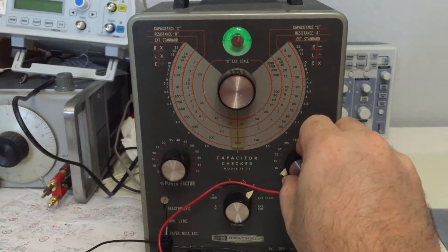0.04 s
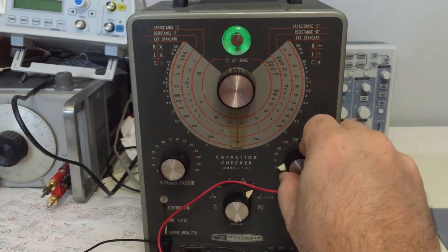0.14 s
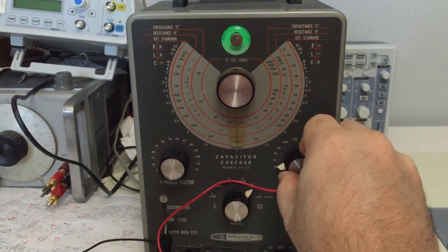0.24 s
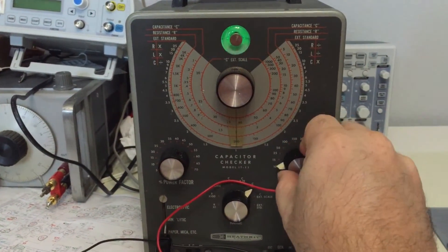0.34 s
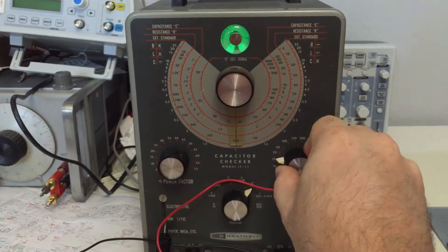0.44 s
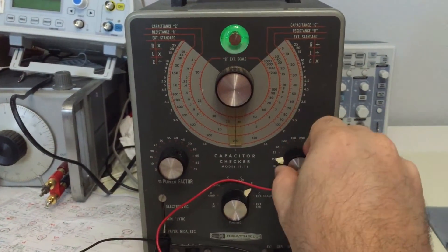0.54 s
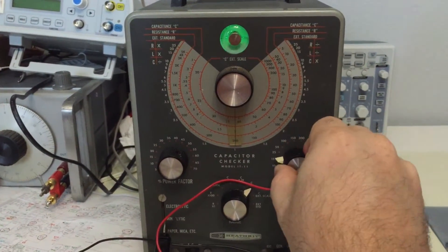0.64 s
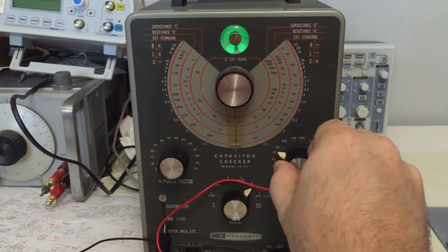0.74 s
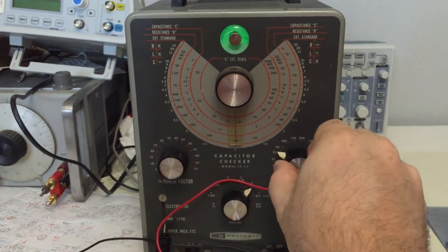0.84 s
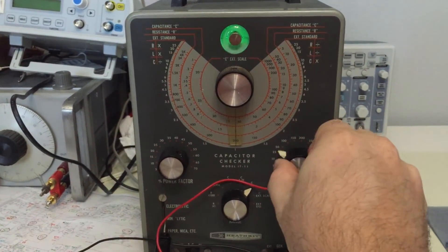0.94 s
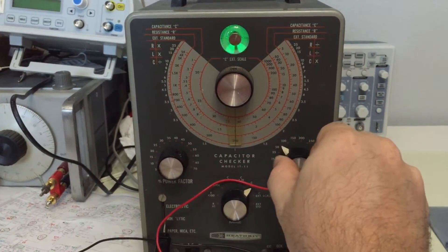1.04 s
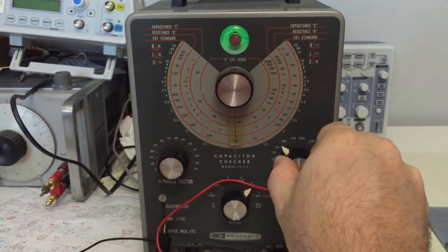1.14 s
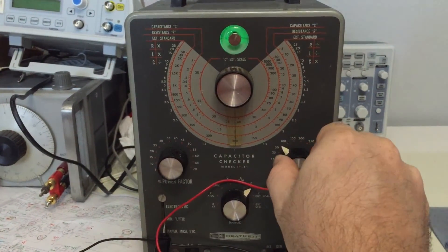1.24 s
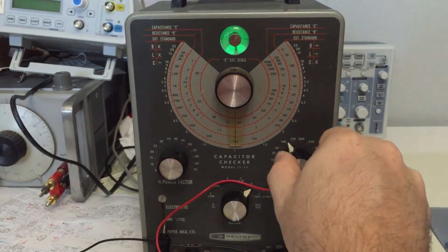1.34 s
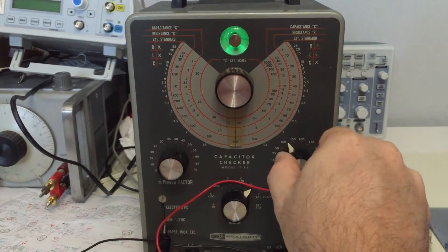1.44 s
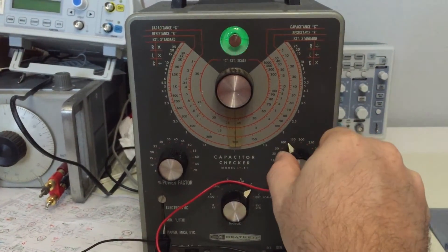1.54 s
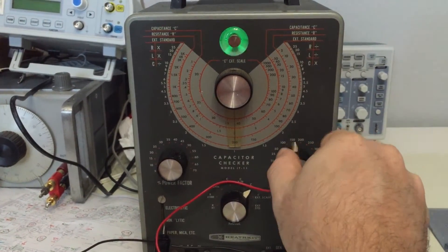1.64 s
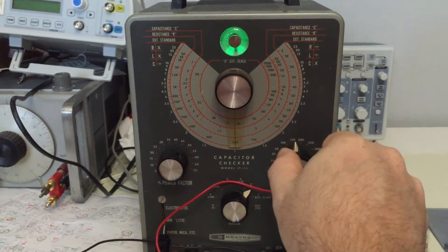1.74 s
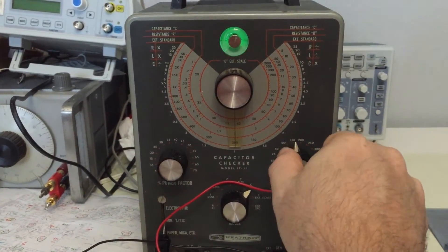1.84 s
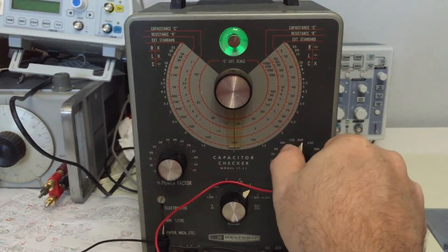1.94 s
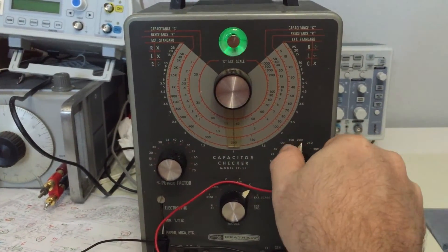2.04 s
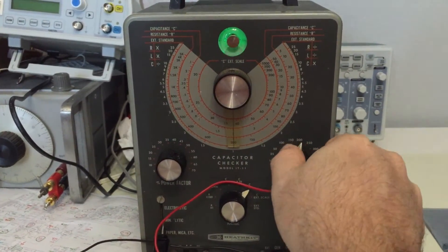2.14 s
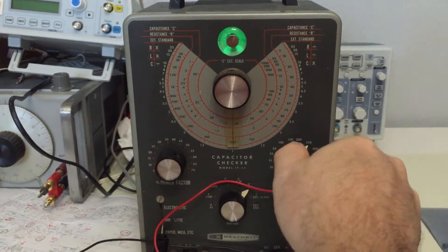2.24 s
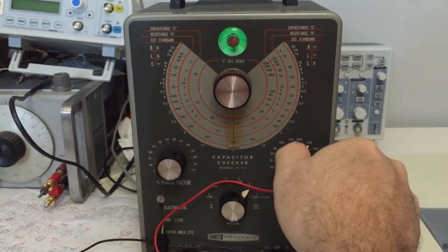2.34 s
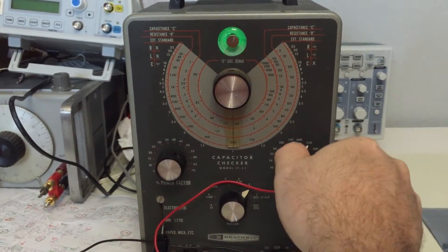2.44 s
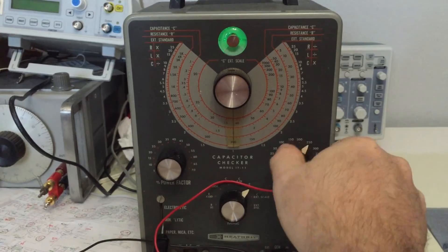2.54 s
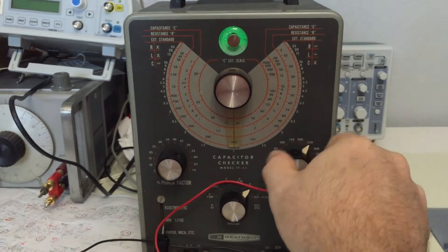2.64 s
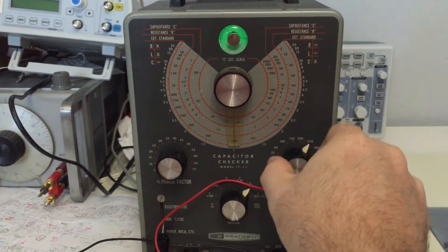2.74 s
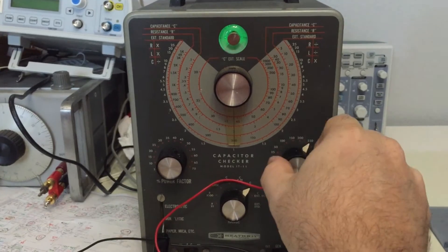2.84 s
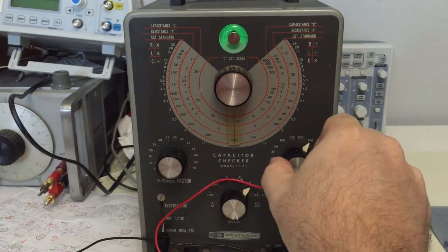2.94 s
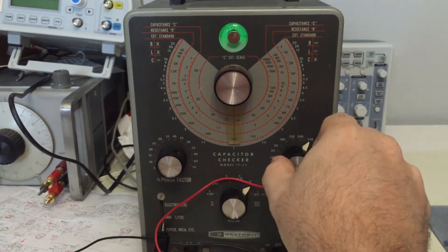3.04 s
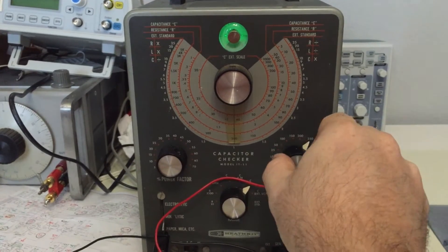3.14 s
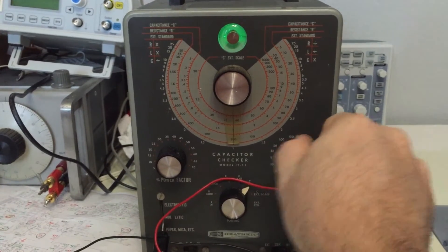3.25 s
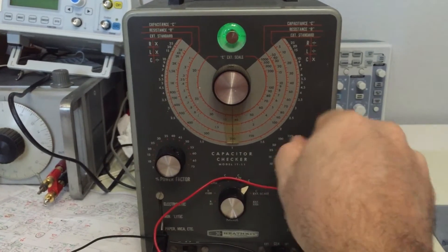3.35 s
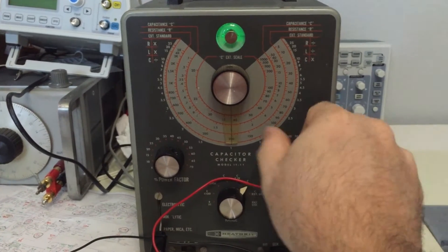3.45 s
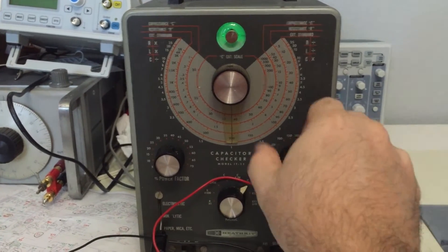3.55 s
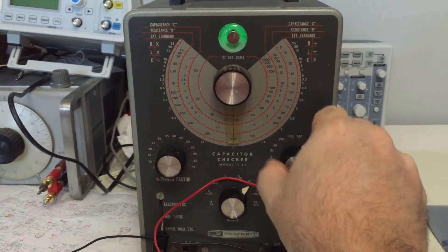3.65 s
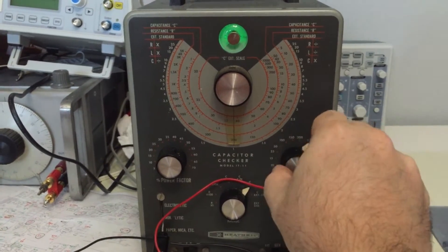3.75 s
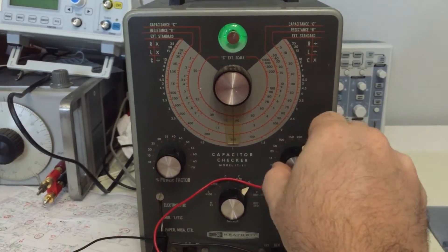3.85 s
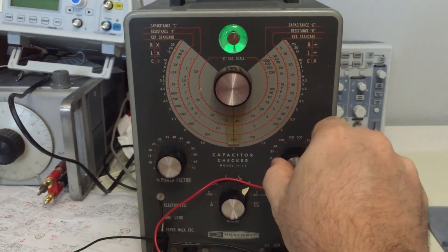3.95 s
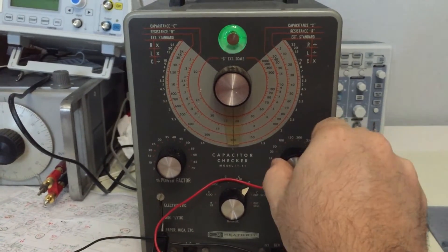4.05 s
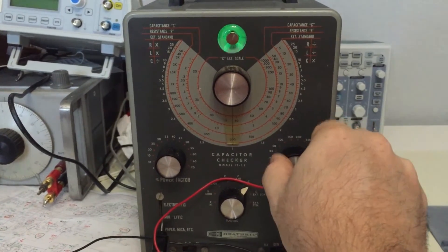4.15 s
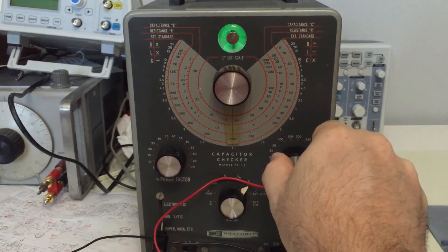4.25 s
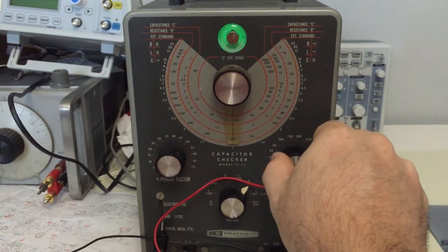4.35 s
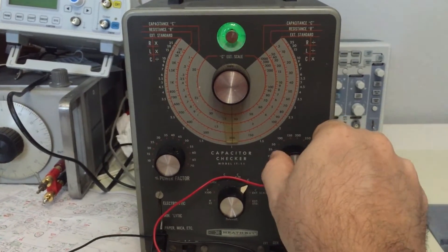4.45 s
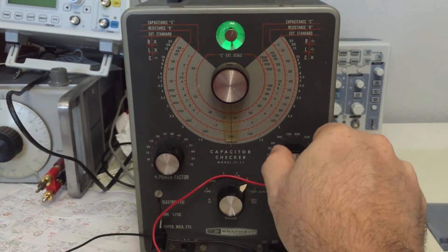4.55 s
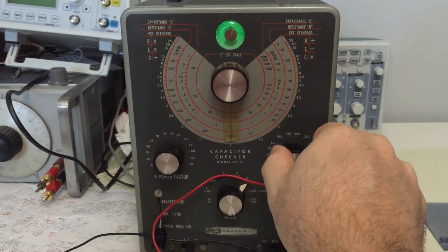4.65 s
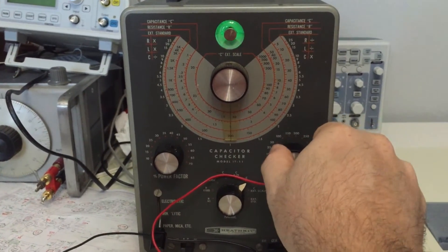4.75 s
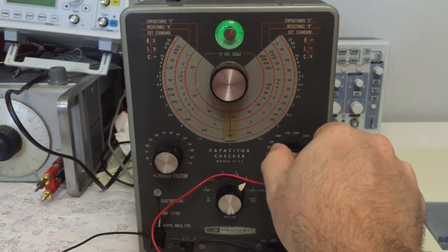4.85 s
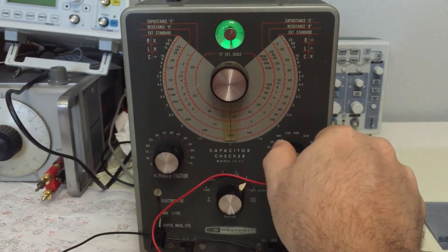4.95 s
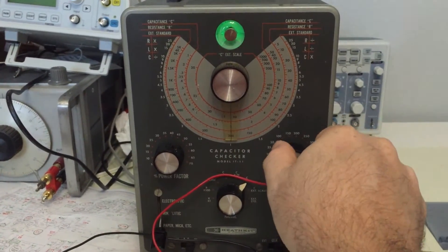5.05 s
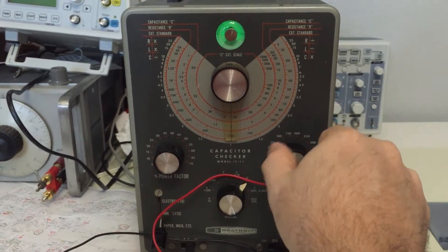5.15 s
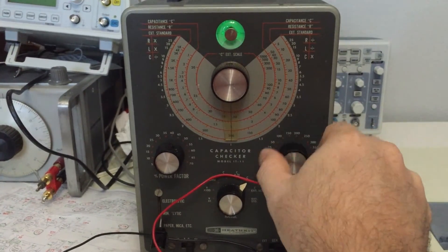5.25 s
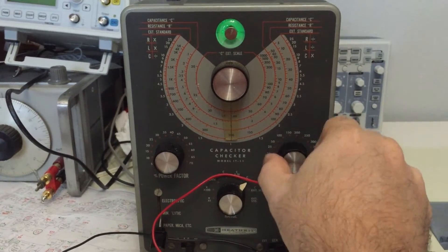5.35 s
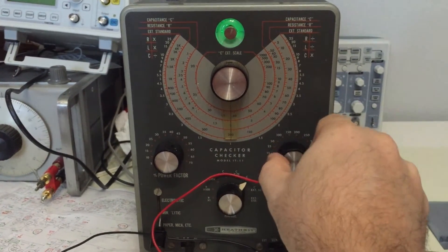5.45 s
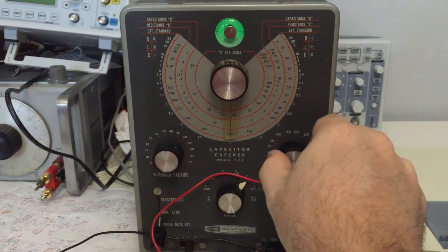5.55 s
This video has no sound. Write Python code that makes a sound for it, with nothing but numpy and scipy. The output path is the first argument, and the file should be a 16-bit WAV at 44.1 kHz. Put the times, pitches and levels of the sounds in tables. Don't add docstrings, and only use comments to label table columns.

```python
import sys
import numpy as np
from scipy import signal
from scipy.io import wavfile
from scipy.ndimage import uniform_filter1d

SR = 44100
rng = np.random.default_rng(int(sys.argv[2]) if len(sys.argv) > 2 else 0)


def generate_wav(sig):
    pcm = np.round(np.clip(np.atleast_2d(sig).T, -1, 1) * 32767).astype(np.int16)
    wavfile.write(sys.argv[1], SR, pcm)


def elevation(decibels):
    levels = np.asarray(decibels, float)
    return 10 ** (levels / 20)


N = 247004


def peaked(x):
    return x / np.abs(x).max()


def read(points, hz):
    f, value = np.transpose(points)
    return np.interp(np.log(hz + 1), np.log(f + 1), value)


def add(mix, s, sound):
    part = mix[round(s * SR):][:len(sound)]
    part += sound[:len(part)]


def colour(x, points, tilt_db=0):
    hz = np.abs(np.fft.fftfreq(4096, 1 / SR))
    gain_db = read(points, hz) + tilt_db * np.log2((hz + 100) / 2000)
    log_gain = np.log(elevation(np.maximum(gain_db, -100)))
    taps = np.fft.ifft(np.exp(np.conj(signal.hilbert(log_gain)))).real[:2048]
    return signal.oaconvolve(x, taps)[:len(x)]


def noise(points, patchy_db):
    hz = np.fft.rfftfreq(2048, 1 / SR)
    a, b, patches = rng.standard_normal((N // 512 + 5, 1025, 3)).T
    patches = uniform_filter1d(patches, size=5, axis=0)
    patches = uniform_filter1d(patches, size=5, axis=1) * 5
    z = (a + 1j * b) * elevation(read(points, hz)[:, None] + patchy_db * patches)
    x = signal.istft(z, nperseg=2048, noverlap=1536)[1][:N]
    return x / x.std()


def rings(modes, t, phases, spread_db, detune=0):
    hz, db, t60 = np.transpose(modes)[:, :, None]
    phases = phases[:, None]
    strength_db = db + spread_db * np.sin(7 * phases)
    hz = hz * (1 + detune * np.cos(5 * phases))
    return (elevation(strength_db - 60 * t / t60) * np.sin(2 * np.pi * hz * t + phases)).sum(0)


# (frequency [Hz], density [dB per Hz])
RUMBLE_SPECTRUM = [(16, -49.5), (28, -17.5), (41, -15.5), (59, -0.5), (92, -10.5), (140, 3), (167, -5),
                   (215, 0), (238, -3.5), (259, -12), (340, -17.5), (440, -50), (750, -120)]
# (time [s], level [dB])
DISTANT_LEVEL = [(0, -61), (.15, -64.5), (.4, -71.5), (1.2, -68), (2.2, -68.5), (3.001, -66.5),
                 (3.8, -65.5), (4.402, -66.5), (5.3, -66.5), (5.6, -66.5)]


def rumble():
    t = np.arange(SR // 2) / SR
    shake = np.zeros(N)
    rise_s, t60_s = 0.024, 0.37
    for s, *_, shake_db in CABINET_ROCKS:
        swell = 1 - np.exp(-(t / rise_s) ** 2)
        add(shake, s - .015, swell * elevation(shake_db + 2 - 60 * t / t60_s))
    distant = elevation(np.interp(np.arange(N) / SR, *np.transpose(DISTANT_LEVEL)))
    low = noise(RUMBLE_SPECTRUM, patchy_db=2.0)
    deep = signal.sosfiltfilt(signal.butter(3, 90, fs=SR, output="sos"), low)
    upper = low - deep
    deep_level = distant + elevation(-2.5) * shake
    upper_level = elevation(1.0) * distant + shake
    return deep_level * deep / deep.std() + upper_level * upper / upper.std()


# (frequency [Hz], density [dB per Hz])
HISS_SPECTRUM = [(190, -36), (330, -5), (414, -6), (479, -15.5), (519, -11), (1460, -16.5), (1780, -18),
                 (1990, -18), (2380, -20), (6280, -25), (15800, -30.5)]


def hiss():
    return elevation(-76) * noise(HISS_SPECTRUM, patchy_db=1.0)


# (frequency [Hz], level [dB], t60 [s])
WALL_MODES = [(640.5, -1, 0.17), (964, 0, 0.046), (1200, -7.5, 0.09), (1646, -14.5, 0.026),
              (1740, -5, 0.079), (2003, -10.5, 0.06), (2396, -6, 0.076)]


def knocks(rows, body, length, steep, width_hz, ring_db, box_db):
    t = np.arange(SR // 8) / SR
    out = np.zeros(N)
    envelope = np.exp(-(t / length) ** steep) * np.minimum(t / 0.00072, 1)
    r = np.exp(-np.pi * width_hz / SR)
    for s, peak_db, bright_db, ring_hz in rows:
        grit = envelope * rng.standard_normal(len(t))
        ring = signal.lfilter([1], [1, -2 * r * np.cos(2 * np.pi * ring_hz / SR), r * r], grit)
        phases = rng.uniform(0, 2 * np.pi, len(WALL_MODES))
        wall_ring = rings(WALL_MODES, t, phases, spread_db=1.5, detune=.015)
        tilted = colour(grit, [(1, 0.003), (2, 0)], bright_db)
        walls = signal.fftconvolve(tilted, wall_ring)[:len(t)]
        loose = .8 + 10 * uniform_filter1d(rng.standard_normal(len(t)), size=250)
        knock = peaked(colour(grit, body, bright_db))
        knock += elevation(ring_db) * peaked(ring) + elevation(box_db) * peaked(walls * loose)
        add(out, s, elevation(peak_db) * knock)
    return out


# (time [s], peak [dB], brightness [dB per octave], ring [Hz])
CABINET_KNOCKS = [(0.02, -68, 4.5, 510), (0.881, -50, -2.5, 620), (1.143, -70.5, -1, 585),
                  (1.491, -59, -6, 980), (1.801, -60, 1, 958), (2.097, -61.5, 3.5, 596),
                  (2.491, -67, 8, 2155), (2.564, -47, 1.5, 660), (2.617, -53, -5.5, 495),
                  (2.685, -61, -2, 493), (3.752, -55.5, -10.5, 600), (3.802, -68.5, -0.5, 497),
                  (4.048, -48.5, -4.5, 608), (4.676, -59.5, 2, 956), (5.072, -55.5, 2.5, 968),
                  (5.175, -62, -5, 979)]
# (frequency [Hz], density [dB per Hz])
KNOCK_SPECTRUM = [(150, -32.5), (250, 2.5), (760, -15), (946, -2.5), (1390, -12.5), (2430, -21.5),
                  (2870, -22.5), (3830, -23), (14000, -49.5)]


def cabinet_knocks():
    return knocks(CABINET_KNOCKS, KNOCK_SPECTRUM, length=.014, steep=2.5, width_hz=150, ring_db=-8, box_db=-5)


# (time [s], peak [dB], brightness [dB per octave])
BALL_SLIPS = [(0.123, -43, -5.5), (0.4464, -44, -4.5), (0.7415, -44, -5), (1.0139, -40, -5.5),
              (1.3491, -47.5, -4), (1.687, -44, -5), (1.9658, -42, -6), (2.2822, -40, -4.5),
              (3.9334, -51, -5), (4.1937, -47, -7.5), (4.5473, -55.5, -6.5), (4.9395, -45, -5.5)]


def slips():
    t = np.arange(700) / SR
    out = np.zeros(N)
    cam = [(150, -37.0), (600, -10.5), (2200, 2.0), (8500, -2), (11000, -4.0)]  # (Hz, dB)
    envelope = (elevation(-60 * t / 0.025) + elevation(-8.0)) * np.minimum(t / 0.0071, 1)
    for s, peak_db, bright_db in BALL_SLIPS:
        rub = envelope * rng.standard_normal(len(t))
        add(out, s, elevation(peak_db) * peaked(colour(rub, cam, bright_db)))
    return out


def seat(wall_db, shaft_db, top_db):
    body_db = -1.5 + 0.19 * wall_db
    above_shaft_db = -2.0 - .55 * shaft_db
    return [(150, -10), (600, body_db), (1900, body_db + 3.5), (2700, wall_db), (4000, -1.0), (5500, shaft_db),
            (7000, above_shaft_db), (8500, 1), (11500, top_db), (14500, 4.0 + 0.42 * top_db)]


# (time [s], level [dB], cabinet wall [dB], shaft ring [dB], top [dB])
DETENT_SNAPS = [(0.14, -12.5, -1.5, 1, -1), (0.4611, -12.5, -3.5, -2.5, -5), (0.7575, -12, 3.5, -6.5, -1.5),
                (1.0268, -12.5, 5, -3.5, -1.5), (1.3625, -11.5, 0, -3.5, -3.5), (1.6999, -11.5, -1, -4, -1),
                (1.984, -13.5, -6, -1, -4), (2.2945, -13, -1, -7, 0.5), (3.946, -10.5, -3, 0, 1),
                (4.2081, -11, -4.5, 3, -0.5), (4.5642, -11.5, 3.5, 4, 1.5), (4.9554, -11, 4.5, -5, 3)]
# (frequency [Hz], density [dB per Hz])
SNAP_SPECTRUM = [(180, -39), (300, 0), (1500, -9), (3060, -3), (3550, -8.5), (3790, -3), (4790, -5),
                 (5560, -3), (7250, -4), (9450, -3), (10800, -1.5), (12500, -4.5), (15800, -6)]
# (frequency [Hz], level [dB], t60 [s])
PANEL_MODES = [(600, -17.5, 0.13), (825, -26, 0.16), (1116, -31, 0.098), (1480, -36, 0.03),
               (1827, -16.5, 0.055), (2637, -19.5, 0.028), (3209, -21, 0.049), (3755, -21.5, 0.02),
               (3940, -15, 0.074), (4580, -14.5, 0.019), (5400, -8, 0.04), (5760, -8.5, 0.042),
               (6300, -19.5, .04), (7700, -13.5, .035), (8430, -7, 0.03), (9000, -19.5, 0.049),
               (9700, -17, 0.047), (11730, -9.5, 0.026), (13041, -10.5, 0.029), (14551, -12, 0.047),
               (15800, -15.5, 0.051)]
# (frequency [Hz], level [dB], t60 [s])
SPRING_MODES = [(5090, -21, .19), (5230, -28, .14)]


def ball_impact(t, grit):
    contacts = elevation(6.5 * uniform_filter1d(grit[2], size=16))
    bounce_s = .0008
    rebound = np.maximum(t - bounce_s, 0)
    chatter = 0.9 * np.exp(-t / 0.0003) + (rebound > 0) * np.exp(-rebound / .0004)
    bright = (chatter + elevation(-4.5 - 60 * t / 0.03)) * contacts * grit[0]
    bright += elevation(5.5) * np.exp(-rebound / .0005) * np.sin(2 * np.pi * 8300 * rebound)
    bright[round(bounce_s * SR) + 1] -= elevation(7)
    dull = elevation(-4 - 60 * t / 0.092) * (1 - np.exp(-t / 0.0087)) * grit[1]
    split = signal.butter(2, 3200, fs=SR, output="sos")
    return bright - signal.sosfilt(split, bright) + signal.sosfilt(split, dull)


def struck_modes(t, grit, spring_db):
    phases = rng.uniform(0, 2 * np.pi, len(PANEL_MODES) + len(SPRING_MODES))
    panel_phases, spring_phases = np.split(phases, [len(PANEL_MODES)])
    grip = 1 + 7 * uniform_filter1d(grit[1], size=120)
    panel = rings(PANEL_MODES, t, panel_phases, spread_db=1.5, detune=.005)
    modes = elevation(-11.5) * grip * panel * (0.78 + 1.8 * np.exp(-t / 0.0015))
    taps = elevation(-60 * t / .2) * grit[0] * (abs(grit[1]) > 2.4)
    walls = rings(WALL_MODES, t, phases[:len(WALL_MODES)], spread_db=3, detune=0.013)
    modes += elevation(-32.5) * peaked(signal.fftconvolve(taps, walls)[:len(t)])
    buzz = .7 + 9 * uniform_filter1d(grit[2], size=150)
    modes += elevation(spring_db) * buzz * rings(SPRING_MODES, t, spring_phases, spread_db=4, detune=.008)
    return modes * np.minimum(t / 0.0021, 1)


def snaps():
    t = np.arange(SR // 4) / SR
    near, blows = np.zeros(N), np.zeros(N)
    impulse = 1. * (t == 0)
    for s, level_db, *seated_db in DETENT_SNAPS:
        spring_db = -8 if s < 3 else -20
        notch = seat(*seated_db)
        grit = rng.standard_normal((3, len(t)))
        impact = peaked(colour(ball_impact(t, grit), SNAP_SPECTRUM))
        snap = colour(impact + struck_modes(t, grit, spring_db), notch)
        blow = colour(colour(impulse, SNAP_SPECTRUM), notch)
        add(near, s - .0002, elevation(level_db + 12.5) * snap / np.linalg.norm(snap))
        add(blows, s, elevation(level_db + 10.5) * blow / np.linalg.norm(blow))
    return near, blows


# (time [s], swing [dB], frequency [Hz], t60 [s], bench shake [dB])
CABINET_ROCKS = [(.16, -55.5, 112, 0.17, -73), (0.475, -50, 119, 0.46, -51), (0.77, -45.5, 94, 0.14, -46.5),
                 (1.041, -46, 118.5, 0.17, -55.5), (1.377, -46.5, 114.1, 0.26, -53),
                 (1.714, -49, 129, 0.12, -58), (1.998, -53.5, 124, 0.16, -56.5),
                 (2.312, -68, 119.2, 0.32, -64), (2.568, -48, 188.7, 0.1, -62.5),
                 (3.299, -53, 180.5, 0.1, -47.5), (3.323, -25.5, 119, 0.12, -58),
                 (3.335, -48, 67.6, 0.79, -51), (3.469, -50.5, 126.7, 0.35, -62),
                 (3.961, -44, 95, 0.17, -52.5), (4.223, -44.5, 81.3, 0.11, -59.5),
                 (4.582, -43.5, 116, 0.19, -57.5), (4.972, -53.5, 118, 0.17, -55)]


def rocks():
    t = np.arange(SR // 3) / SR
    out = np.zeros(N)
    for s, db, hz, t60, _ in CABINET_ROCKS:
        swing = (1 - np.exp(-(t / 0.018) ** 2)) * elevation(db + 4 - 60 * t / t60)
        add(out, s, swing * np.sin(2 * np.pi * (hz * t + rng.random())))
    return out


def landings():
    t = np.arange(2000) / SR
    out = np.zeros(N)
    feet = [(80, -10), (220, 1), (600, -6.5), (1100, -14), (2500, -34)]  # (Hz, dB)
    scatter = rng.uniform(-1, 1, (len(DETENT_SNAPS), 2))
    for (s, level_db, *_), (late, size) in zip(DETENT_SNAPS, scatter):
        thud = t / .003 * np.exp(-t / 0.0038) * rng.standard_normal(len(t))
        add(out, s + .034 + .004 * late, elevation(level_db - 32 + 3 * size) * peaked(colour(thud, feet)))
    return out


# (time [s], peak [dB], length [s])
SKIN_TICKS = [
    (1.178, -66, .003),
    (1.248, -67.5, 0.02),
    (1.293, -66.5, .006),
    (1.336, -66, 0.016),
]


def ticks():
    t = np.arange(2000) / SR
    out = np.zeros(N)
    for s, peak_db, length in SKIN_TICKS:
        grit = rng.standard_normal(len(t)) * np.exp(-(t / length) ** 2)
        add(out, s, elevation(peak_db) * peaked(colour(grit, [(1500, -22), (5000, 0), (16000, -0.5)])))
    return out


# (time [s], level [dB])
SLIDE_LEVEL = [
    (3.22, -90.5),
    (3.292, -88),
    (3.412, -61),
    (3.446, -73),
    (3.572, -92),
    (3.72, -84),
]
# (frequency [Hz], density [dB per Hz])
SCRAPE_SPECTRUM = [(120, -23.5), (200, 6), (659, -4), (1080, -11), (1710, -14.5), (1910, -11.5),
                   (4430, -17.5), (4950, -23), (16000, -41)]


def slide():
    s, scrape_db = np.transpose(SLIDE_LEVEL)
    sizes = elevation(3 * np.minimum(rng.exponential(1, N), 4))
    sparse = rng.standard_normal(N) * sizes * (rng.random(N) < .15)
    grains = colour(sparse, SCRAPE_SPECTRUM)
    return elevation(np.interp(np.arange(N) / SR, s, scrape_db, -120, -120)) * grains / grains.std()


# (time [s], peak [dB], brightness [dB per octave], ring [Hz])
FINGER_DRAGS = [
    (3.237, -46, -0.5, 1890),
    (3.258, -37.5, 0.5, 4200),
]


def drags():
    return knocks(FINGER_DRAGS, SCRAPE_SPECTRUM, length=0.044, steep=2.6, width_hz=380, ring_db=-10.5, box_db=-6.0)


# (time [s], peak [dB], brightness [dB per octave], ring [Hz])
GRIP_RATTLE = [
    (3.296, -47.5, -3.5, 590),
    (3.3105, -35, 3.5, 6920),
    (3.312, -39.5, 1.5, 3820),
    (3.332, -34, 2, 1200),
    (3.3895, -38.5, 4, 2070),
    (3.433, -43, 0, 1000),
    (3.498, -45, 0, 1200),
    (3.559, -56, -3, 1096),
    (3.625, -54.5, 1.5, 1970),
    (3.635, -58.5, -5.5, 1700),
]


def rattle():
    return knocks(GRIP_RATTLE, SCRAPE_SPECTRUM, length=0.0095, steep=2.5, width_hz=310, ring_db=-6.5, box_db=-5.0)


# (frequency [Hz], t60 [s])
ROOM_DECAY = [(300, 0.35), (1400, 0.23), (3700, 0.22), (9700, 0.17), (15000, 0.14)]


def room(x):
    taps = np.zeros(SR // 2)
    at = np.arange(200, len(taps) - 10, 10)
    taps[at + rng.integers(0, 10, len(at))] = rng.choice([-1., 1.], len(at))
    hz, t, z = signal.stft(taps, SR, nperseg=256)
    decay = elevation(-60 * t / read(ROOM_DECAY, hz)[:, None])
    tail = signal.istft(z * decay, SR, nperseg=256)[1]
    return signal.fftconvolve(x, tail / np.linalg.norm(tail))[:N]


def scene():
    near, blows = snaps()
    small = cabinet_knocks() + slips() + landings() + ticks() + drags() + rattle()
    far = elevation(-7.5) * blows + elevation(-8.0) * small
    turn = (np.arange(N) * 7 // SR) % 3
    wet = sum(room(far * (turn == k)) for k in range(3))
    return (rumble() + hiss() + near + small + rocks() + slide() + wet)[None]


def top_cut(x):
    return signal.sosfilt(signal.butter(12, 17100, fs=SR, output="sos"), x)


# (frequency [Hz], gain [dB])
MIC_RESPONSE = [(9700, 1), (10500, -4.5), (11300, 1), (16000, 0)]


def record(dry):
    heard = colour(dry[0], MIC_RESPONSE)[None]
    cut = signal.sosfilt(signal.butter(6, 44, "high", fs=SR, output="sos"), heard)
    narrow_taps = signal.firwin(401, 15780, window=("kaiser", 8), fs=SR)
    wide_taps = signal.firwin(401, 16900, window=("kaiser", 10), fs=SR)
    narrow = signal.oaconvolve(cut, narrow_taps[None], "same")
    wide = signal.oaconvolve(cut, wide_taps[None], "same")
    mix = narrow + elevation(-30.5) * (wide - narrow)
    return top_cut(mix)


dry = scene()
out = record(dry)
generate_wav(out)
```